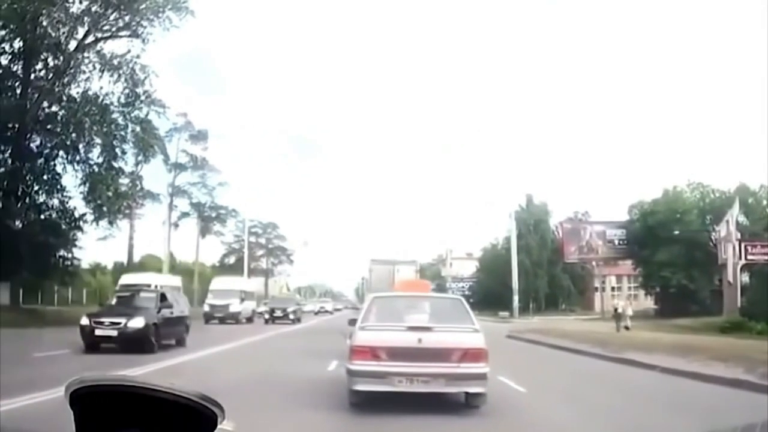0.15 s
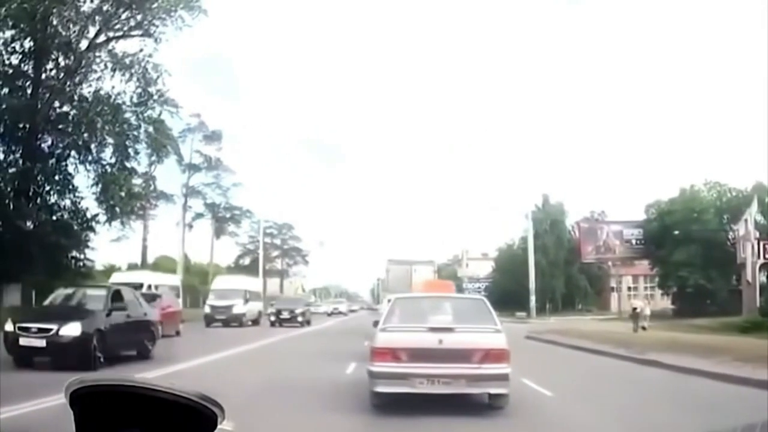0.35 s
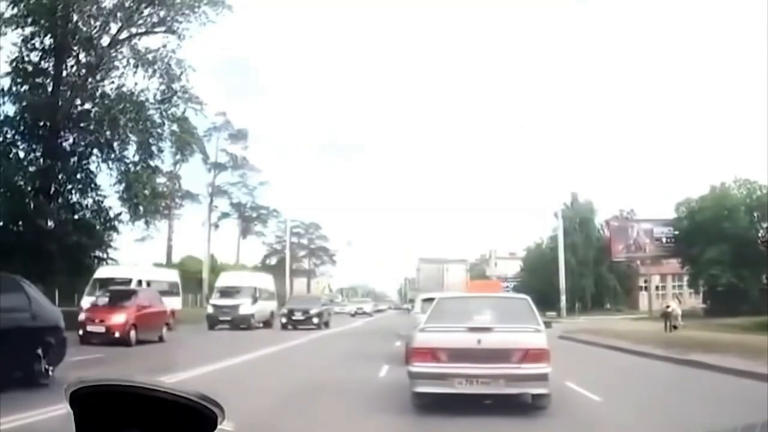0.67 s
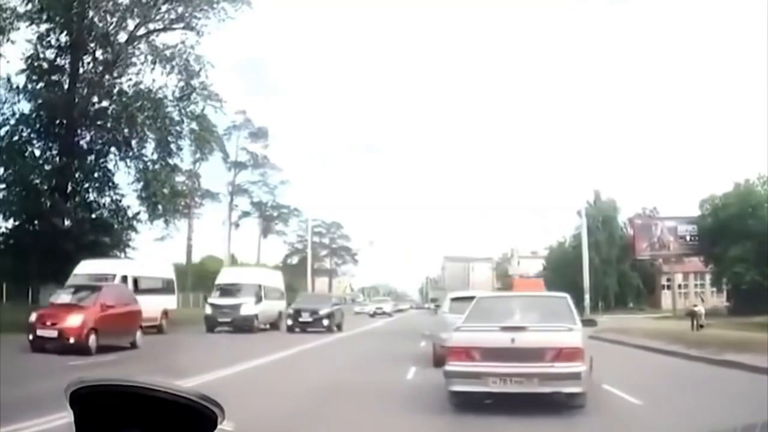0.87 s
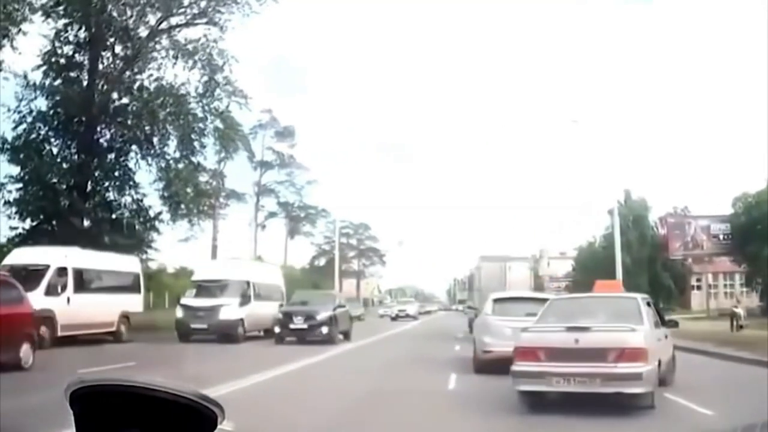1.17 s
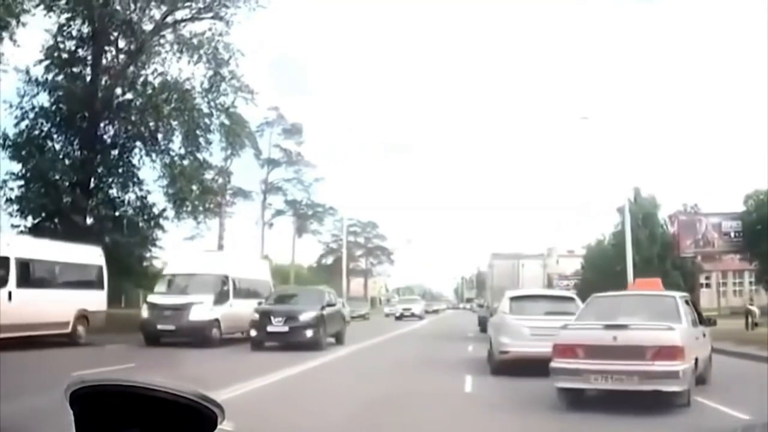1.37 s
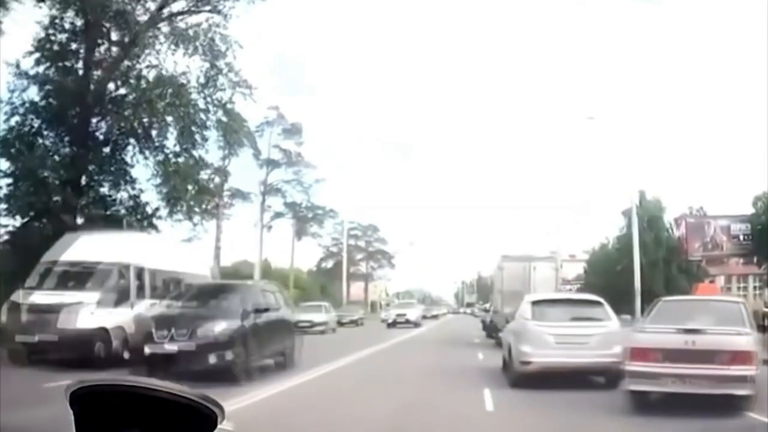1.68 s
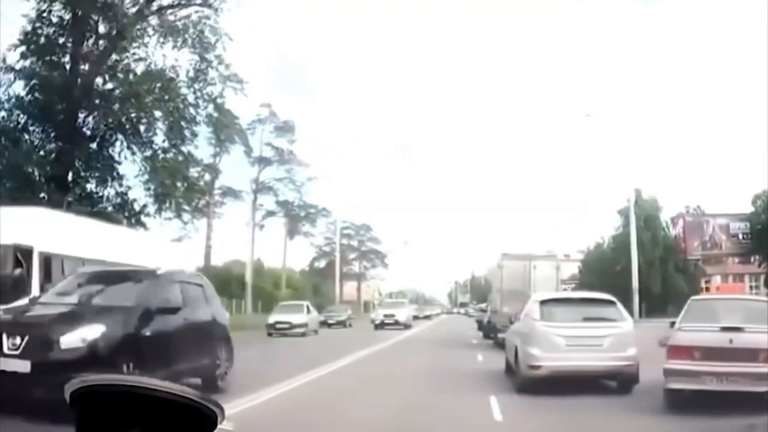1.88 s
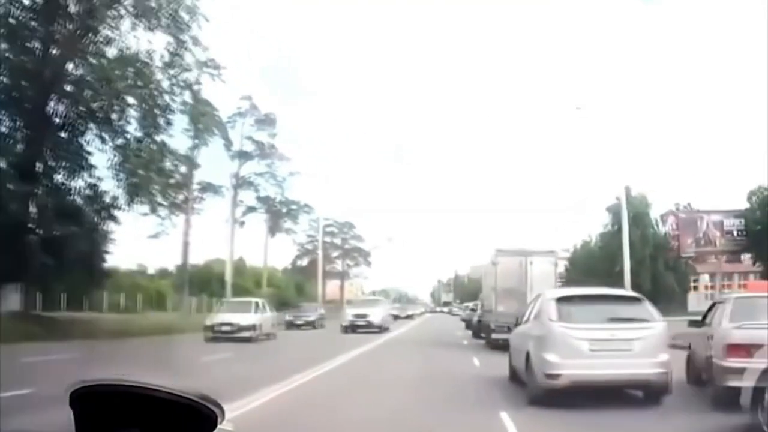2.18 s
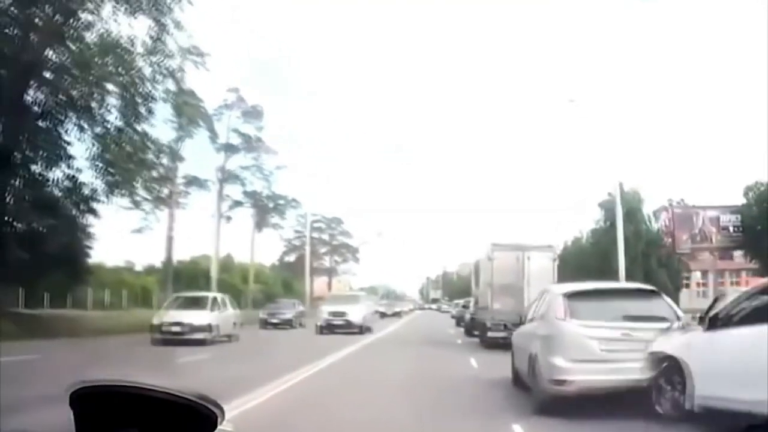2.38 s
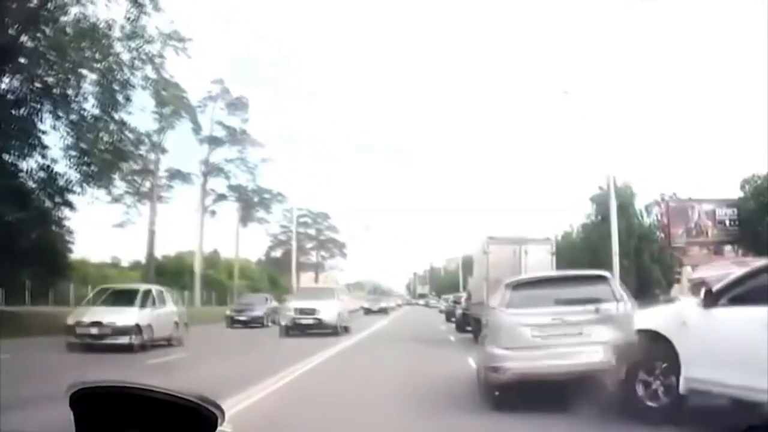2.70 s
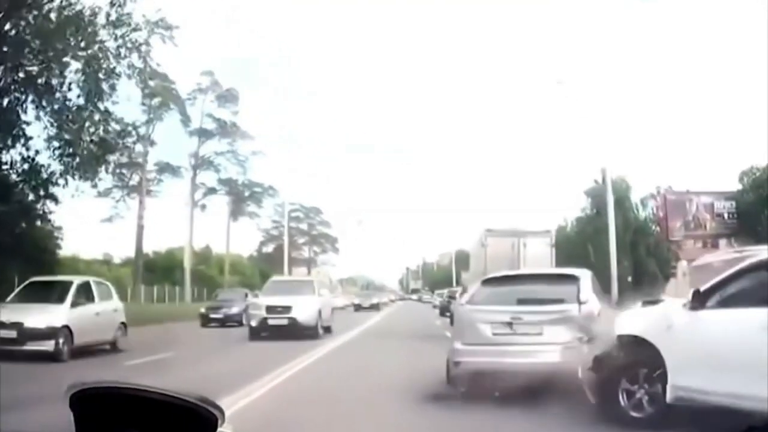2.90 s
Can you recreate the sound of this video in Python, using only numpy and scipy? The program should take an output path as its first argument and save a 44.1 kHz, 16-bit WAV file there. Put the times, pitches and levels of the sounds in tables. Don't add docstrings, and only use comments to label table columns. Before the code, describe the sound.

A car crash heard from inside a moving car, through a muffled, boxy dashboard microphone. Road roar runs throughout, with a low tyre drone from 0.25 to 1 s and soft hisses of passing cars. Low thumps come at 1.1-1.6 s while tyre chirps thicken into skidding until 2.6 s. Then a booming bang and dense crunch of panels and glass, ringing metal, small debris and a last scrape near 2.9 s.

```python
import sys
import numpy as np
from scipy import signal
from scipy.fft import rfft, irfft
from scipy.io import wavfile
from scipy.ndimage import uniform_filter1d

SR = 44100
rng = np.random.default_rng(int(sys.argv[2]) if len(sys.argv) > 2 else 0)


def output_pcm(signal):
    pcm = np.clip(np.atleast_2d(signal).T, -1, 1) * 32767
    wavfile.write(sys.argv[1], SR, np.round(pcm).astype(np.int16))


def volts_from_decibels(level):
    exponent = np.asarray(level, float) / 20
    return 10 ** exponent


N = 134505


def walk(rate_hz):
    hold = int(SR / rate_hz)
    steps = np.repeat(rng.standard_normal(N // hold + 1), hold)
    return 1.386 * uniform_filter1d(uniform_filter1d(steps, hold), hold)[:N]


def unit(x):
    return x / np.sqrt(np.mean(x ** 2))


def frequencies():
    return np.maximum(np.fft.rfftfreq(N, 1 / SR), 1.)


def colour(x, gain):
    cepstrum = irfft(np.log(gain(frequencies()) + 1e-9), N)
    cepstrum[1:N // 2 + 1] *= 2
    cepstrum[N // 2 + 1:] = 0
    return irfft(rfft(x) * np.exp(rfft(cepstrum)), N)


def cabin_gain(f):
    # pitch_hz, width_hz, level_db
    resonances = [(179.6, 62, -6.5), (255, 80.3, 3), (336, 99, -5.5), (552, 180, -10.5), (776, 120, -7.5),
                  (1077, 473, -4.5), (1300, 200, -6.5), (2106, 490, -16.5), (2550, 550, -15),
                  (3125, 790, -25.5), (3740, 490, -26.5), (4280, 290, -53), (6100, 470, -49.5),
                  (10400, 6600, -51)]
    bass_cut_hz = 90
    power = 0
    for hz, width, db in resonances:
        detune = (f - hz ** 2 / f) / width
        power = power + volts_from_decibels(2 * db) / (1 + detune ** 2) ** 2
    return np.sqrt(power) / np.sqrt(1 + (bass_cut_hz / f) ** 4)


def tilt(db_per_octave):
    return lambda f: volts_from_decibels(db_per_octave * np.log2(f / 1000))


def band(hz, octaves):
    return lambda f: np.exp(-.5 * (np.log2(f / hz) / octaves) ** 2) + 1e-4


def road(t):
    # time_s, level_db, rumble_db (share of low rumble)
    roar = [(0, -24, 4), (.2, -24.5, 5), (.3, -24.5, 3), (0.548, -23, 2.5), (.63, -22, 6),
            (0.751, -21.5, 5), (1.051, -22.5, 0.5), (1.15, -22.5, 1.5), (1.401, -19.5, -4.5),
            (1.62, -23, -1.5), (1.902, -23.5, -2.5), (2.298, -20, -4.5), (2.599, -17.5, -4.5),
            (3.05, -21, -7.5)]
    tilt_db_per_octave, swell_db, flicker_db = -1.5, .5, 1.2
    s, db, low_db = np.array(roar).T
    swell, out = walk(2.8), 0
    f = frequencies()
    spectrum = rfft(rng.standard_normal(N)) * tilt(tilt_db_per_octave)(f)
    for hz in 62.5 * 2. ** np.arange(8):
        octave = np.clip(1 - abs(np.log2(f / hz)), 0, 1)
        part = irfft(spectrum * octave, N)
        rumble = np.interp(t, s, low_db) * np.clip(1.5 - abs(np.log2(hz / 330)), 0, 1)
        out = out + part * volts_from_decibels(rumble + swell_db * swell + flicker_db * walk(11.0))
    return unit(colour(out, cabin_gain)) * volts_from_decibels(np.interp(t, s, db))


def drone(t):
    # time_s, pitch_hz, level_db
    cavity = [(.25, 256, -28), (.3, 250, -16), (.39, 245, -15), (.435, 243, -27), (.475, 240, -16),
              (.56, 236, -14), (.59, 236, -34), (.68, 240, -18), (.81, 240, -17), (.84, 240, -32),
              (.88, 238, -19), (1.0, 237, -20), (1.07, 245, -30)]
    width_hz, steady, fade_s = 14, .9, 0.034
    s, hz, db = np.array(cavity).T
    grain = walk(2 * width_hz) + 1j * walk(2 * width_hz)
    turn = np.exp(2j * np.pi * np.cumsum(np.interp(t, s, hz)) / SR)
    fade = np.clip(np.minimum(s[-1] - t, t - s[0]) / fade_s, 0, 1)
    tone = (steady * np.sqrt(2) + (1 - steady) * grain) * turn
    return tone.imag * volts_from_decibels(np.interp(t, s, db)) * fade


def passing(t):
    # nearest_s, passing_time_s, level_db, hiss_centre_hz, spread_octaves
    cars = [(.55, 0.3, -28, 731, 0.19), (1.302, 0.22, -27, 1199, 0.31), (1.45, 0.11, -32, 1913, 0.65),
            (1.722, 0.21, -33, 3005, 0.27), (1.8, 0.45, -29.5, 1300, 0.18), (2.27, 0.057, -26, 1143, 0.31),
            (2.259, 0.16, -32, 2480, 0.27), (2.391, 0.055, -25, 1205, 0.22), (2.46, 0.037, -24, 1985, 0.54),
            (3.0, 0.1, -30.5, 2153, .06), (1.68, 0.014, -47, 4260, 0.065),
            (1.757, 0.023, -49.5, 5030, 0.28), (2.1, 0.015, -55.5, 4736, .12),
            (1.49, 0.038, -56.5, 4630, 0.096), (1.82, .02, -59.5, 5580, 0.07), (2.351, .2, -27, 1133, .2),
            (2.995, 0.024, -62, 6100, 0.11)]
    out = 0
    for s, duration, db, hz, octaves in cars:
        noise = rng.standard_normal(N)
        hiss = unit(colour(noise, lambda f: band(hz, octaves)(f) * cabin_gain(f)))
        out = out + hiss * volts_from_decibels(db) / (1 + ((t - s) / duration) ** 2) ** 1.4
    return out


def rough_tones(t, events):
    sag, jitter_hz, steady, overtone_db = .025, 22, .78, -11
    out, wobble = np.zeros(N), walk(150)
    rough = steady + (1 - steady) * (walk(120) + 1j * walk(120))
    for s, length, hz, db in events:
        u = (t - s) / length
        on = abs(u) < 2
        pitch = hz * (1 - sag * u[on]) + jitter_hz * wobble[on]
        turn = rough[on] * np.exp(2j * np.pi * np.cumsum(pitch) / SR)
        cabin_step = min(cabin_gain(2 * hz) / cabin_gain(hz), 1)
        overtone = volts_from_decibels(overtone_db) * cabin_step * turn ** 2
        out[on] += volts_from_decibels(db + 3.5) * np.exp(-(u[on] / 0.54) ** 2) * (turn + overtone).imag
    return out


def chirps(t):
    # middle_s, length_s, pitch_hz, level_db
    skids = [(0.491, .1, 700, -30.5), (1.027, .05, 980, -27), (1.216, 0.065, 985, -25),
             (1.275, .07, 1225, -24.5), (1.366, 0.038, 985, -29), (1.422, 0.029, 1235, -29),
             (1.425, .08, 1345, -23.5), (1.488, .035, 2700, -29), (1.502, .05, 1345, -32.5),
             (1.556, 0.038, 1425, -19.5), (1.543, 0.022, 2030, -34), (1.63, .04, 1190, -27),
             (1.68, .04, 2680, -33), (1.697, .03, 1290, -22.5), (1.718, .035, 1220, -25.5),
             (1.705, 0.041, 2545, -34.5), (1.77, .045, 1355, -20), (1.745, 0.058, 2640, -35.5),
             (1.796, 0.018, 2700, -35), (1.822, .05, 1385, -31), (1.845, .04, 1195, -30),
             (1.898, 0.033, 1300, -29.5), (1.943, .06, 1140, -23.5), (2.047, .05, 1250, -27),
             (2.155, .02, 1230, -21), (2.173, .03, 2370, -33.5), (2.192, .04, 1110, -22.5),
             (2.239, .05, 1090, -22.5), (2.254, 0.046, 1290, -29.5), (2.278, .04, 1095, -18),
             (2.265, 0.055, 2190, -29), (2.305, 0.032, 1175, -21), (2.311, .04, 2200, -30.5),
             (2.375, .04, 1185, -16.5), (2.374, .04, 1385, -26.5), (2.389, 0.066, 1015, -25),
             (2.406, .04, 815, -28.5), (2.409, .03, 1200, -18), (2.435, .045, 1165, -24),
             (2.435, .04, 1075, -21), (2.455, 0.065, 2720, -30.5), (2.476, .06, 1310, -22),
             (2.483, 0.058, 990, -25), (2.521, .04, 1030, -22.5), (2.545, 0.091, 795, -22.5),
             (2.587, .035, 1040, -13), (2.606, 0.036, 965, -16.5), (2.63, 0.068, 1300, -20)]
    return rough_tones(t, skids)


def seams(t):
    # start_s, level_db, boom_hz
    joints = [(1.084, -16.5, 241), (1.114, -18, 243), (1.16, -14, 244), (1.205, -12.5, 256),
              (1.244, -29, 250), (1.274, -11, 258), (1.305, -17, 267), (1.342, -21, 258),
              (1.397, -22, 254.5), (1.507, -25, 284), (1.562, -13.5, 273), (1.584, -15.5, 256.5)]
    t60_s, rise_s = 0.15, .01
    out = 0
    for s, db, hz in joints:
        age = np.maximum(t - s, 0)
        rise = np.minimum(age / rise_s, 1) ** 2
        out = out + volts_from_decibels(db + 4 - 60 * age / t60_s) * np.sin(2 * np.pi * hz * age) * rise
    return out


def crush(t):
    # start_s, attack_s, hold_s, release_db_per_s, level_db, brightness_db_per_octave
    crunches = [
        (2.561, .02, 0.015, 155, -21, 6),
        (2.605, 0.039, 0.02, 232, -14, 5),
        (2.611, .015, 0.082, 400, -13.5, -2),
        (2.705, 0.025, 0.047, 146, -27.5, 5.5),
        (2.804, 0.018, 0.02, 152, -34, 9),
        (2.904, 0.0095, 0.008, 506, -22.5, -2),
    ]
    grains_per_s, grain_spread_db = 9000, 2
    out = 0
    for s, attack, hold, release_db, db, bright_db in crunches:
        chance = rng.random((2, N))
        size = volts_from_decibels(-grain_spread_db * np.log(chance[1] + 0.065))
        grains = (chance[0] < grains_per_s / SR) * size * rng.standard_normal(N)
        sound = unit(colour(grains, lambda f: tilt(bright_db)(np.clip(f, 600, 3500)) * cabin_gain(f)))
        fall = release_db * np.maximum(t - s - attack - hold, 0)
        out = out + sound * np.clip((t - s) / attack, 0, 1) * volts_from_decibels(db - fall)
    return out


def blows(t):
    # start_s, level_db, boom_hz
    hits = [(2.565, -2, 246.4), (2.592, -15, 223), (2.627, -11.5, 256.6), (2.643, -10.5, 274),
            (2.667, -10, 254), (2.688, -12.5, 263), (2.705, -8.5, 282), (2.655, -16, 400),
            (2.684, -10, 337), (2.762, -11, 247), (2.797, -13, 244), (2.868, -17.5, 252),
            (2.916, -19.5, 265)]
    boom_t60_s, boom_rise_s = 0.12, .006
    crack_db, crack_s = -8, .012
    boom, crack, noise = 0, 0, rng.standard_normal(N)
    for s, db, hz in hits:
        age = np.maximum(t - s, 0)
        rise = np.minimum(age / boom_rise_s, 1) ** 2
        boom = boom + volts_from_decibels(db - 60 * age / boom_t60_s) * np.sin(2 * np.pi * hz * age) * rise
        crack = crack + volts_from_decibels(db + crack_db) * (t >= s) * np.exp(-age / crack_s) * noise
    return boom + 4 * colour(crack, cabin_gain)


def rings(t):
    # middle_s, length_s, pitch_hz, level_db
    panels = [(2.648, .03, 760, -19), (2.682, .035, 800, -21), (2.718, .02, 1320, -20.5),
              (2.745, .02, 1198, -21), (2.768, .045, 1334, -21), (2.814, .04, 780, -27.5),
              (2.915, .03, 600, -24), (2.9, .04, 2130, -31.5), (2.935, .03, 2175, -27),
              (2.992, .05, 2173, -23.5), (3.035, .03, 2166, -31)]
    return rough_tones(t, panels)


def scene():
    t = np.arange(N) / SR
    driving = road(t) + drone(t) + passing(t) + chirps(t) + seams(t)
    crash = crush(t) + blows(t) + rings(t)
    return (driving + crash)[None]


def drop_quiet_bands(x):
    # lower_edge_hz, level_db (per line)
    limits = [(4100, -80), (4500, -78), (4950, -76), (5450, -78), (5950, -79.5), (6600, -79), (7300, -77.5),
              (8200, -77), (9200, -77.5), (10600, -74), (11800, -60), (13000, -82), (13900, -75),
              (15000, -60)]
    scatter_db, masking, line_limit_db = 2, .5, -1.5
    f, _, z = signal.stft(x, SR, nperseg=2048, noverlap=1024, boundary="even")
    waver = rng.standard_normal((len(limits), z.shape[1]))
    frame_power = np.sum(abs(z) ** 2, axis=0)
    loud = frame_power / np.median(frame_power)
    upper_edges = [hz for hz, _ in limits[1:]] + [SR]
    for k, ((lo, db), hi) in enumerate(zip(limits, upper_edges)):
        rows = (f >= lo) & (f < hi)
        power = abs(z[rows]) ** 2
        limit = volts_from_decibels(2 * db + scatter_db * (waver[0] + waver[k])) * loud ** masking
        band_open = np.mean(power, axis=0) > limit
        line_open = power > limit * volts_from_decibels(2 * line_limit_db)
        z[rows] *= band_open * line_open
    return signal.istft(z, SR, nperseg=2048, noverlap=1024)[1][:N]


def low_pass(x):
    return signal.sosfilt(signal.butter(12, 15740, fs=SR, output="sos"), x)


def record(dry):
    bass_cut_hz, hiss_db = 110, -85
    rounded = np.tanh(1.086 * dry[0]) / 1.076
    x = colour(rounded, lambda f: 1 / np.sqrt(1 + (bass_cut_hz / f) ** 6))
    mix = drop_quiet_bands(x) + volts_from_decibels(hiss_db) * rng.standard_normal(N)
    return low_pass(mix[None])


dry = scene()
out = record(dry)
output_pcm(out)
```